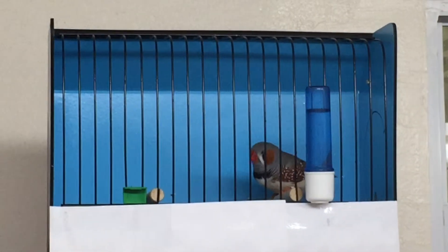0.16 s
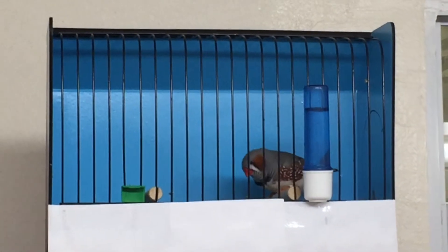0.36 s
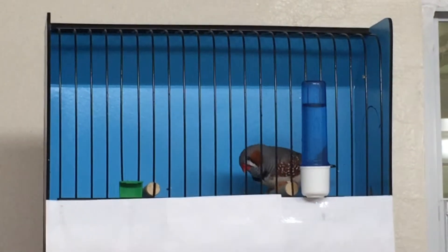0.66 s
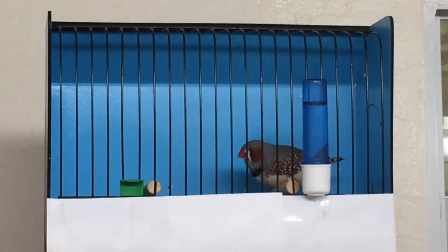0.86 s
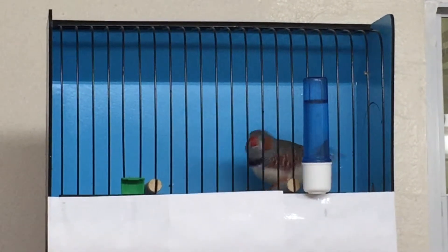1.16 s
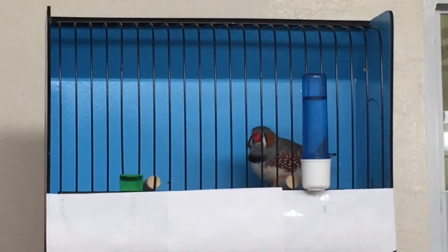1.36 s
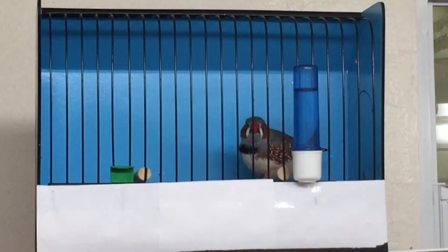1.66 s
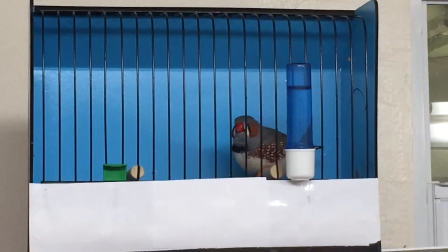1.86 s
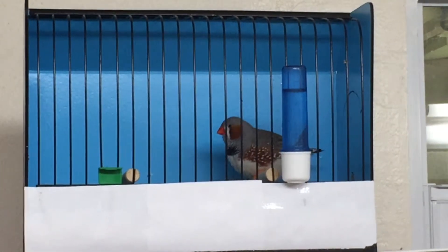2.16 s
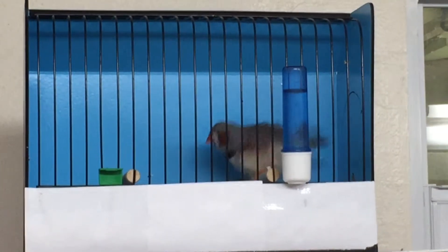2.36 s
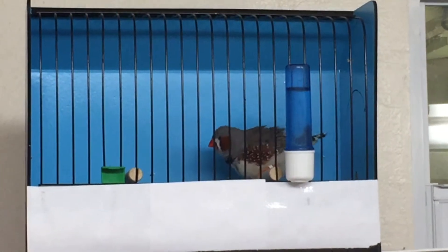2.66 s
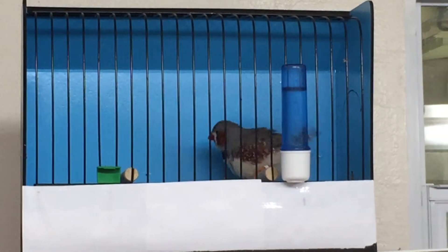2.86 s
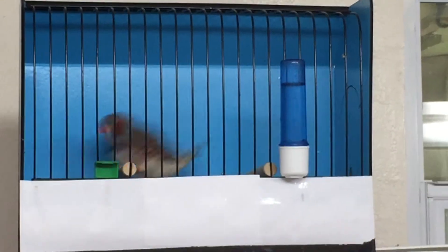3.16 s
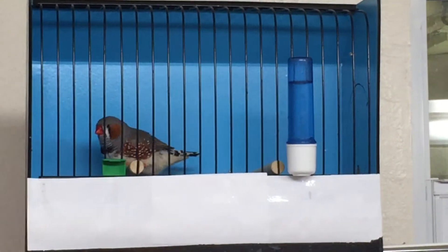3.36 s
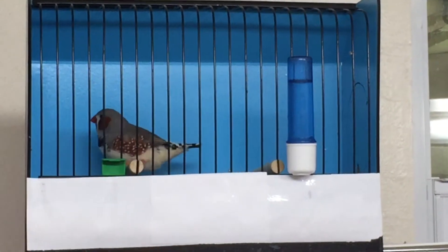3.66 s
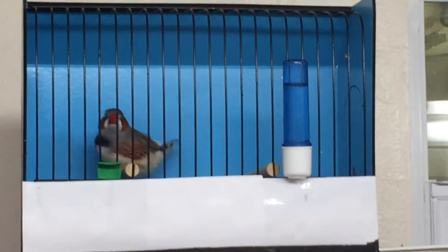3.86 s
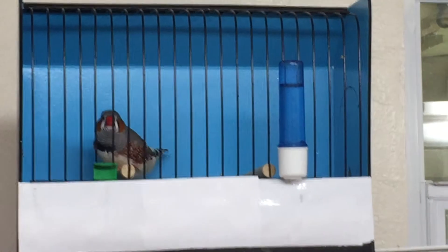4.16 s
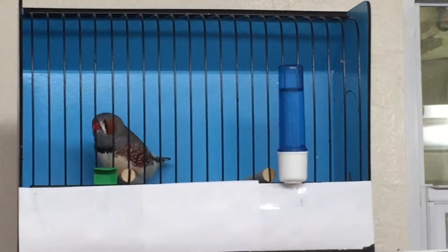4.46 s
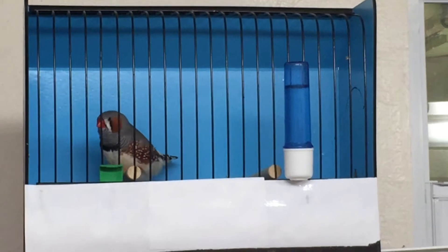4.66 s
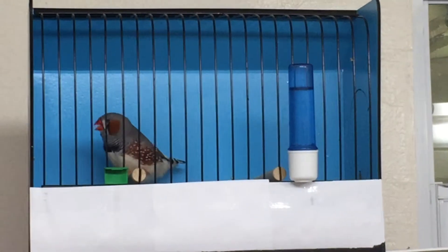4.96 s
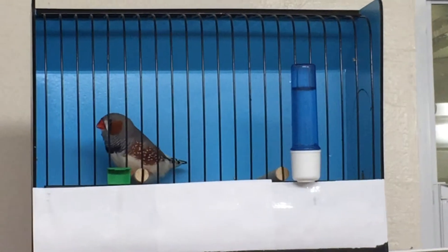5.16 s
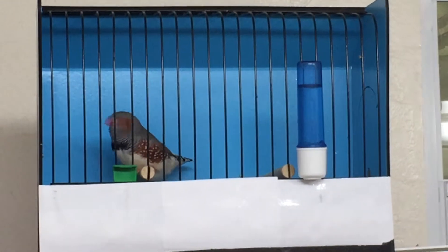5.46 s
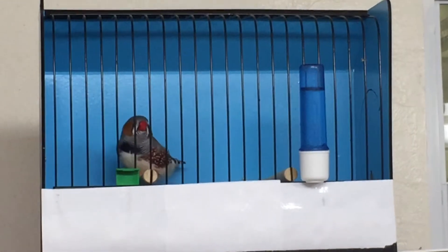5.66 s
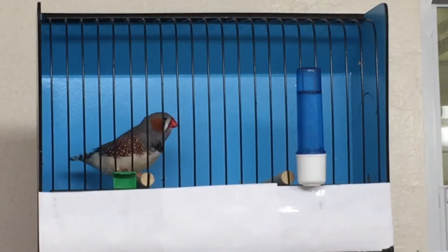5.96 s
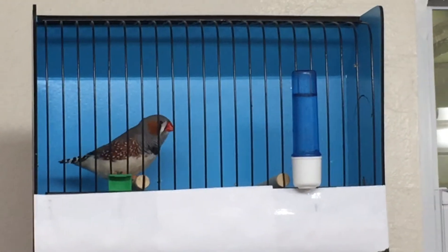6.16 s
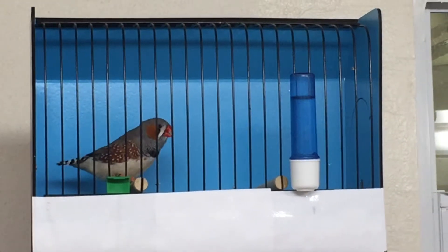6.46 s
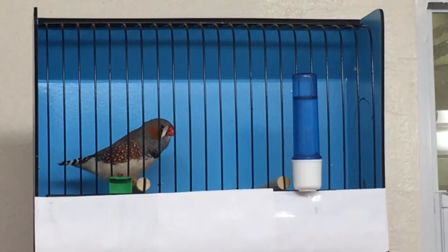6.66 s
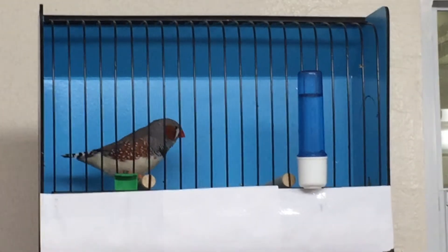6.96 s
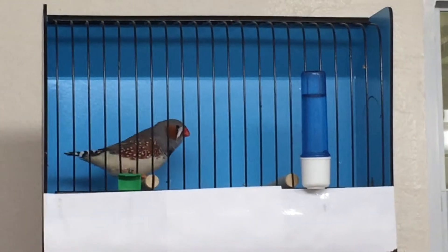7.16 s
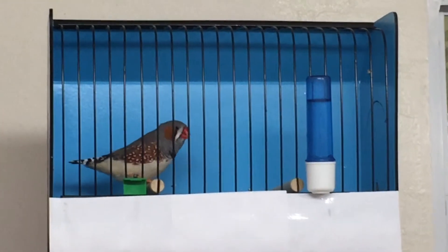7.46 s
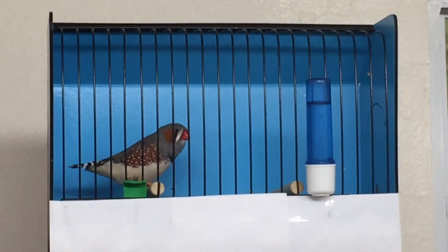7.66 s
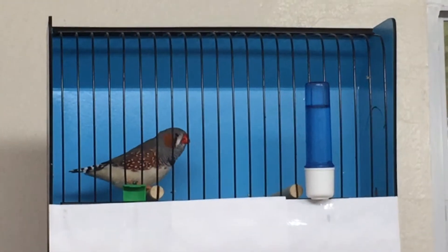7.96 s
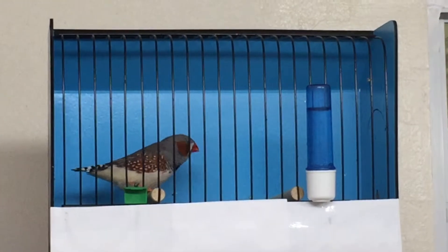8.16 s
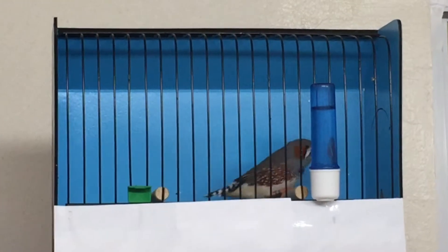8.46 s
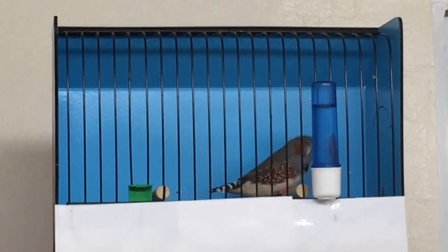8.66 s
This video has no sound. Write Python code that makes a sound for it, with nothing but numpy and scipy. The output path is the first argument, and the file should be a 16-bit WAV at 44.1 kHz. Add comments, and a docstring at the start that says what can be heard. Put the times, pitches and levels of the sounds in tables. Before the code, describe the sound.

Indoor finch cages heard from a handheld microphone a short distance away: rapid overlapping chatter of nasal beeps, scratchy song notes, tiny whistles and sharp high peeps. A quick cluster of chirps and rising breathy squeaks comes about halfway, then calls grow denser toward the end. Distant birds swell behind, small dry ticks come from perch and wire, and a quiet low motor hum continues throughout.

```python
"""Caged finches crowd a room: nasal calls made of steady syrinx pulses shaped by the beak resonance.
Gliding sines whistle, peep, chirp and squeak; jittery falling pulses with turbulence make harsh song syllables.
Claws and beaks tick on perch and wire as short noise cracks; far cages blur into a swelling chorus.
A motor hums in wavering lines, a far engine drones down in pitch, and decaying noise tails answer from the walls."""
import sys
import numpy as np
from scipy import signal
from scipy.fft import rfft, irfft, next_fast_len
from scipy.io import wavfile
from scipy.ndimage import uniform_filter1d, map_coordinates

SR = 44100
rng = np.random.default_rng(int(sys.argv[2]) if len(sys.argv) > 2 else 0)


def pcm_store(signal):
    """Save signal as 16-bit PCM."""
    levels = np.round(np.clip(np.atleast_2d(signal), -1, 1) * 32767)
    wavfile.write(sys.argv[1], SR, levels.astype(np.int16).T)


N = 388962  # samples

# nasal calls: start_s, length_s, middle_pitch_hz, beak_resonance_hz, level_db
NASAL_CALLS = [(.526, .066, 487, 2600, -46), (.95, .115, 489, 2650, -36), (1.075, .155, 665, 3400, -36.5),
               (1.29, .06, 675, 3800, -44), (1.68, .04, 566, 3500, -42), (1.745, .05, 512, 1900, -47),
               (1.81, .13, 659, 3100, -42), (2.318, .1, 485, 2700, -45), (2.44, .125, 553, 3400, -40),
               (2.61, .05, 628, 2400, -43), (2.69, .05, 452, 2000, -47), (3.03, .05, 557, 2100, -43),
               (3.14, .05, 452, 2000, -45), (3.266, .07, 450, 2400, -41), (3.449, .085, 487, 2300, -37.5),
               (3.642, .07, 490, 2500, -50), (3.939, .05, 553, 1900, -48), (4.04, .115, 631, 3100, -34),
               (4.485, .045, 454, 2200, -40), (4.724, .094, 578, 2300, -47), (5.595, .055, 651, 3200, -42),
               (5.716, .077, 685, 3600, -41), (6.065, .14, 510, 3300, -38), (6.272, .09, 600, 2600, -44),
               (6.372, .05, 539, 2900, -45), (6.723, .12, 665, 3200, -40), (6.98, .125, 588, 2600, -36),
               (7.175, .125, 666, 3700, -39), (7.295, .04, 814, 2000, -41), (7.89, .165, 668, 3800, -40),
               (8.076, .047, 625, 2100, -38), (8.124, .05, 562, 2800, -44), (8.23, .13, 590, 2700, -35),
               (8.735, .085, 642, 3000, -34.5)]
# first three partials of a call against the resonance's skirt; the nose weakens the third: gain_db
LOW_PARTIALS_DB = [-3, -2, -4]
# whistles: start_s, length_s, first_pitch_hz, last_pitch_hz, level_db
WHISTLES = [(0.0, 0.028, 2870, 2584, -36), (0.32, 0.077, 5830, 5640, -39.5),
            (0.494, 0.0096, 5200, 4940, -34.5), (0.752, 0.042, 1980, 2300, -39),
            (0.932, 0.031, 3170, 3270, -40), (1.369, 0.047, 5720, 5810, -37.5),
            (1.376, 0.018, 1910, 1580, -37), (1.468, 0.062, 6280, 6360, -48),
            (1.532, 0.044, 4020, 3960, -39.5), (1.957, 0.024, 4460, 4570, -41),
            (1.969, 0.042, 2440, 2780, -35.5), (2.145, 0.028, 2446, 2460, -37),
            (2.171, 0.15, 5470, 5500, -47.5), (3.328, 0.022, 2637, 2750, -35.5),
            (3.352, 0.026, 2260, 1814, -40.5), (3.49, 0.051, 3840, 4440, -33),
            (3.707, 0.041, 5660, 5520, -44), (3.759, 0.025, 2030, 2170, -40),
            (3.8, 0.026, 2385, 2390, -32.5), (3.959, 0.05, 6200, 5800, -45.5),
            (4.164, 0.047, 2530, 2670, -35.5), (4.808, 0.091, 5720, 5630, -41.5),
            (5.172, 0.094, 1895, 2540, -45), (5.21, 0.049, 4630, 4050, -28.5),
            (5.276, 0.012, 2200, 2050, -37), (5.811, 0.024, 4060, 4230, -34),
            (5.983, 0.048, 2320, 2530, -34), (6.255, 0.07, 5780, 5660, -44.5),
            (6.439, 0.038, 3024, 2107, -34), (6.776, 0.036, 4570, 4190, -28.5),
            (6.855, 0.099, 5840, 5450, -40.5), (7.381, 0.069, 2260, 2795, -41),
            (7.492, 0.021, 4470, 4390, -39.5), (7.738, 0.024, 2030, 1890, -34.5),
            (7.746, 0.041, 4230, 4000, -32), (7.95, 0.07, 6040, 6600, -49), (8.373, 0.052, 5520, 5620, -40),
            (8.394, 0.015, 1900, 1940, -33), (8.704, 0.037, 5250, 3400, -32)]
# thin high peeps that start sharp and sink: start_s, length_s, first_pitch_hz, level_db
PEEPS = [(0.012, 0.07, 6200, -42.5), (0.63, 0.069, 6300, -40.5), (1.046, 0.016, 5900, -35.5),
         (1.516, 0.029, 5920, -37), (1.776, 0.051, 6200, -40), (2.798, 0.065, 6300, -44),
         (3.4, 0.074, 6870, -47.5), (3.647, 0.085, 6300, -40), (4.177, 0.039, 7170, -50),
         (4.723, 0.13, 6250, -42), (5.313, 0.09, 7090, -51), (5.652, 0.088, 6200, -43),
         (6.172, 0.075, 6210, -43), (7.701, 0.041, 5900, -38.5), (8.001, 0.036, 6030, -37.5)]
# quick chirps rich in overtones: start_s, length_s, first_pitch_hz, last_pitch_hz, level_db
CHIRPS = [(2.19, 0.023, 1900, 1820, -36.5), (4.226, 0.038, 1150, 1062, -34), (4.272, 0.044, 1450, 826, -33),
          (8.715, 0.024, 1780, 1540, -31)]
# partials of a chirp, fundamental first: gain_db
CHIRP_PARTIALS_DB = [-1, 8.5, 6.5, -14, -8]
# breathy rising squeaks: start_s, length_s, first_pitch_hz, last_pitch_hz, level_db
SQUEAKS = [(4.259, 0.12, 4800, 7170, -44), (4.452, 0.11, 4570, 7200, -42)]
# harsh syllables, each starting 13 ms before its time: time_s, length_s, vowel_centre_hz, level_db
HARSH_SYLLABLES = [(0.021, 0.081, 4840, -46), (0.115, 0.056, 3000, -46.5), (0.245, 0.072, 3060, -41.5),
                   (0.375, 0.064, 3640, -35), (0.52, 0.043, 3630, -40.5), (0.695, 0.078, 2850, -37.5),
                   (0.775, 0.053, 2700, -41.5), (1.072, 0.095, 3400, -37), (1.191, 0.07, 3340, -41),
                   (1.3, 0.14, 2750, -44.5), (1.424, 0.051, 3230, -34.5), (1.549, 0.11, 3200, -35),
                   (1.808, 0.092, 3860, -40), (2.026, 0.089, 3230, -39), (2.14, 0.09, 2880, -37.5),
                   (2.248, 0.051, 4100, -39.5), (2.847, 0.045, 5150, -40), (3.018, 0.037, 2000, -44.5),
                   (3.274, 0.085, 2450, -46.5), (3.344, 0.087, 3030, -37), (3.409, 0.083, 2820, -38.5),
                   (3.506, 0.1, 3160, -38), (3.68, 0.053, 5000, -52), (3.76, 0.079, 2900, -44),
                   (4.272, 0.11, 3240, -32.5), (4.615, 0.069, 2220, -45), (5.039, 0.032, 3260, -32.5),
                   (5.106, 0.12, 2930, -40.5), (5.264, 0.1, 2880, -37), (5.494, 0.031, 2350, -40.5),
                   (5.682, 0.064, 3420, -38), (5.912, 0.12, 2500, -42), (6.059, 0.092, 3200, -42),
                   (6.452, 0.12, 2940, -34), (6.596, 0.05, 2880, -33.5), (6.668, 0.08, 3450, -38),
                   (6.78, 0.15, 3200, -37), (7.014, 0.13, 3660, -37), (7.163, 0.053, 2970, -36.5),
                   (7.37, 0.038, 2490, -33), (7.5, 0.045, 3100, -38.5), (7.552, 0.12, 3470, -34),
                   (7.745, 0.1, 3150, -35), (8.039, 0.054, 4570, -43), (8.218, 0.13, 3180, -36),
                   (8.405, 0.1, 3470, -35), (8.7, 0.06, 3430, -36)]
# colour of the throat: frequency_hz, gain_db
THROAT = [(500, -5), (900, -5.5), (1400, -4.5), (2200, -1), (3200, -3.5), (4400, 0.5), (5300, 1),
          (6800, -0.5), (8000, -127)]
# colour of breath turbulence: frequency_hz, gain_db
BREATH_HISS = [(5000, -6), (6500, -10.5), (9600, -11.5), (10500, -25), (12000, -20), (15000, -22)]
# ticks on perch and wire: start_s, level_db (before the tick's own colour)
TICKS = [(0.931, -41), (1.078, -33), (2.545, -31), (2.663, -43), (2.779, -37.5), (3.251, -43), (4.18, -32),
         (5.031, -37), (5.116, -39), (5.4106, -36), (7.504, -26)]
# swell of the birds in the far cages: time_s, level_db
CHORUS_SWELL = [(0.0, -38), (0.83, -43), (1.1, -38), (1.69, -48.5), (2.13, -36), (3.12, -51.5),
                (3.46, -40.5), (3.78, -50), (4.07, -40.5), (4.25, -42.5), (4.42, -39.5), (5.26, -40.5),
                (5.36, -77), (5.55, -48), (5.97, -35.5), (7.1, -40), (7.45, -41.5), (7.7, -39),
                (8.399, -38.5), (8.55, -43.5), (8.82, -33)]
# colour of distance, which takes treble from far sounds: frequency_hz, gain_db
DISTANCE = [(4200, 17), (5200, 1.5), (7000, 8)]
# motor lines: pitch_hz, wobble_rate_per_s (random knots), level_db
MOTOR_LINES = [(63.9, 1.52, -50), (125.9, 8.2, -57)]
# far engine: time_s, pitch_hz, level_db
ENGINE_DRONE = [(0, 88, -53), (1.4, 86, -47), (1.7, 86, -71), (2.3, 87, -48.5), (5.7, 79, -45.5),
                (6.2, 71, -52.5), (7.5, 70, -44), (8.82, 69, -41.5)]
# colour of the room tone: frequency_hz, gain_db
ROOM_TONE = [(20, -67), (45, -3.5), (97, -5.5), (208, -9.5), (350, -12), (530, -20.5), (670, -13.5),
             (860, -17), (1600, -17), (5740, -52), (7650, -52), (15500, -41)]
# decay of the wall echoes: frequency_hz, t60_s
WALL_DECAY = [(500, 0.09), (3000, 0.21), (10000, 0.23)]

RESONANCE_WIDTH_HZ, BUZZ_DB = 750, -32  # open beak's resonance; floor under its skirt
HOARSE_HZ = 14000  # an overtone this high would be all noise
SMALL_BODY_HZ = 650  # so small a bird radiates little below this
PEEP_REST_HZ, PEEP_SINK_HZ_PER_S = 4750, 20000  # where a peep levels out, and how fast it sinks there
HISS_AGAINST_VOICE_DB = -13  # treble hiss of a harsh syllable
MOTOR_STEADY = 3.5  # steady part of a motor line over its wavering part
TOP_HZ = 15400  # band limit


def amp(db):
    """Decibels to linear gain."""
    return 10 ** (np.asarray(db) / 20)


def unit(x):
    """Scale to rms 1."""
    return x / np.sqrt(np.mean(x ** 2) + 1e-20)


def along(points, hz):
    """Read a curve of (Hz, value) points on a log frequency axis."""
    f, v = np.transpose(points)
    return np.interp(np.log(hz + 1), np.log(f + 1), v, left=v[0], right=v[-1])


def wobble(n, rate):
    """A smooth random curve, rate knots a second."""
    knots = rng.standard_normal(int(n * rate / SR) + 4)
    return map_coordinates(knots, [np.arange(n) * rate / SR])


def coloured(x, points):
    """Filter x through a spectrum of (Hz, dB) points."""
    m = next_fast_len(len(x) + 4096)
    gain = amp(along(points, np.fft.rfftfreq(m, 1 / SR)))
    return irfft(rfft(x, m) * gain, m)[:len(x)]


def breath(length, attack, release):
    """Time axis and air pressure of one note: it rises, holds, then dies away."""
    t = np.arange(round((length + 5 * release) * SR)) / SR
    decay = np.exp(-np.clip(t - length, 0, None) / release)
    return t, np.clip(t / attack, 0, 1) * decay


def overtones(pitch, gains):
    """Sum sines at multiples of a moving pitch, scaled to rms 1."""
    k = np.arange(1, len(gains) + 1)[:, None]
    start = rng.uniform(0, 2 * np.pi, k.shape)
    phase = k * 2 * np.pi * np.cumsum(pitch) / SR + start
    return unit((gains * np.sin(phase)).sum(0))


def add(track, s, note):
    """Mix a note into the track at s seconds."""
    part = track[max(round(s * SR), 0):][:len(note)]
    part += note[:len(part)]


def nasal_calls(calls):
    """Steady syrinx pulses: overtones strongest near the beak resonance, hoarser the higher; the pitch arches."""
    out, k = np.zeros(N), np.arange(1, 25)[:, None]
    for s, length, middle, beak_hz, db in calls:
        t, push = breath(length - .01, attack=.02, release=.012)
        arch = 1 - 0.0344 * (2 * t / length - 1) ** 2
        pitch = middle * arch * (1 + 0.0042 * wobble(len(t), 60.5))
        partial_hz = k * middle
        peak_db = -6 * np.log1p(((partial_hz - beak_hz) / RESONANCE_WIDTH_HZ) ** 2)
        treble_loss_db = np.clip(partial_hz - 4800, 0, 1000) / 70
        peak_db = np.maximum(peak_db - treble_loss_db, BUZZ_DB)
        peak_db[:3, 0] += LOW_PARTIALS_DB
        peak_db -= np.clip(SMALL_BODY_HZ - partial_hz, 0, None) / 12
        start, sway = rng.uniform(0, 2 * np.pi, (2, *k.shape))
        uneven_db = rng.normal(0, 2.5, k.shape) + 2 * np.sin(70 * t + sway)
        hoarse = np.clip(partial_hz / HOARSE_HZ, 0, 1) ** 2
        tremble = unit(uniform_filter1d(rng.standard_normal(uneven_db.shape), size=140))
        strength = (1 - hoarse + hoarse * tremble) * amp(peak_db + uneven_db)
        tone = strength * np.sin(k * 2 * np.pi * np.cumsum(pitch) / SR + start)
        add(out, s, amp(db) * push * unit(tone.sum(0)))
    return out


def whistles():
    """Gliding tones that waver and flutter, with a weak octave; the higher, the rougher. Peeps join them."""
    out = np.zeros(N)
    plain = [(*row, row[1], .005) for row in WHISTLES]  # glide all along, start fast
    for s, length, first, last, db, glide, attack in plain + peeps():
        t, push = breath(length, attack, release=.008)
        pitch = np.interp(t, [0, glide], [first, last]) * (1 + 0.0224 * wobble(len(t), 131.2))
        pitch *= 1 + first / 330000 * wobble(len(t), 900)
        flutter = amp(3 * wobble(len(t), 140)) + first / 11000 * wobble(len(t), 700)
        add(out, s, amp(db) * push * unit(flutter) * overtones(pitch, amp([[0], [-34]])))
    return out


def peeps():
    """Whistle rows whose pitch sinks at a set rate to a resting pitch, or until the note's hold ends."""
    rows = []
    for s, length, first, db in PEEPS:
        glide = min(length, (first - PEEP_REST_HZ) / PEEP_SINK_HZ_PER_S)
        last = first - PEEP_SINK_HZ_PER_S * glide
        rows.append((s, length, first, last, db, glide, .022))  # soft attack, s
    return rows


def chirps():
    """Fast glides whose overtones pass through the throat's colour."""
    out = np.zeros(N)
    for s, length, first, last, db in CHIRPS:
        t, push = breath(length, attack=0.0011, release=0.0024)
        pitch = np.interp(t / length, [0, 1], [first, last])
        tone = overtones(pitch, amp(CHIRP_PARTIALS_DB)[:, None])
        add(out, s, amp(db) * push * unit(coloured(tone, THROAT)))
    return out


def squeaks():
    """Rising tones so unsteady that each overtone smears into a band."""
    out = np.zeros(N)
    for s, length, first, last, db in SQUEAKS:
        t, push = breath(length, attack=0.01, release=0.0042)
        rise = np.clip(1.8 * t / length - .5, 0, 1)
        smooth_rise = rise ** 2 * (3 - 2 * rise)
        pitch = (first + (last - first) * smooth_rise) * (1 + .035 * wobble(len(t), 1500))
        level = amp(db + 1.1 * wobble(len(t), 270))
        add(out, s, level * push * overtones(pitch, amp([[0], [-10], [-14]])))
    return out


def harsh_syllables():
    """Falling, jittery pulse trains with turbulence, under a scatter of broken tones; each has its own vowel."""
    out = np.zeros(N)
    for s, length, centre, db in HARSH_SYLLABLES:
        start, fall, slow = rng.uniform(size=3)
        t, push = breath(length, attack=.012 + .02 * slow, release=.014)
        pitch = (500 + 500 * start) * np.exp(-5 * fall ** 2 * t) * (1 + .01 * wobble(len(t), 200))
        pulses = np.diff(np.floor(np.cumsum(pitch) / SR), prepend=0)  # one click per cycle
        pulses = pulses * amp(rng.normal(0, 1.3, len(t)))
        noise = rng.standard_normal((2, len(t))) * amp(2.1 * wobble(len(t), 134.0))
        mix = unit(pulses) + .3 * noise[0] + .6 * unit(twitter(len(t), rate=700))
        vowel = [(700, -14), (centre / 1.8, 0), (centre, 7), (centre * 1.5, 0), (centre * 2.1, -8)]
        voice = coloured(coloured(mix, THROAT), vowel)
        ripple = np.transpose([np.geomspace(5000, 16000, 14), rng.normal(0, 3.5, 14)])
        turbulence = coloured(coloured(.5 * noise[1] + unit(pulses), BREATH_HISS), ripple)
        hiss = amp(2.3 * wobble(len(t), 61.0)) * turbulence
        # hiss follows the square of the air pressure
        syllable = push * amp(db) * unit(voice) + push ** 2 * amp(db + HISS_AGAINST_VOICE_DB) * unit(hiss)
        add(out, s - .013, syllable)
    return out


def twitter(n, rate):
    """Broken syllables: brief gliding tones of random pitch, length and strength, rate a second."""
    rows = rng.uniform(size=(int(n / SR * rate) + 1, 5))
    t = np.arange(SR // 40) / SR
    when, height, life, glide, size = rows.T[:, :, None]
    hz, life = 1200 * 5.2 ** height, .006 + .018 * life
    shape = np.sin(np.pi * np.clip(t / life, 0, 1))
    strength = amp(-2.5 * np.log(size + .08))
    tones = strength * shape * np.sin(2 * np.pi * hz * t * (1 + (5 * glide - 3.5) * t))
    where = (when * n).astype(int) + np.arange(len(t)) - len(t) // 4
    return np.bincount(np.clip(where, 0, n).ravel(), tones.ravel(), n + 1)[:n]


def ticks():
    """Claws and beaks on perch and wire: short bright noise cracks that die away exponentially."""
    out, t = np.zeros(N), np.arange(SR // 20) / SR
    for s, db in TICKS:
        crack = rng.standard_normal(len(t)) * amp(-60 * t / 0.079) * np.clip(t / 0.0043, 0, 1)
        add(out, s, amp(db) * coloured(crack, [(1000, -20), (3000, 1), (15000, -13.5)]))
    return out


def chorus():
    """Distant birds blur into calls, broken tones and breath noise that swell and thin out."""
    blur = unit(twitter(N, rate=660)) + 0.6 * rng.standard_normal(N)
    blur = unit(coloured(blur, THROAT))
    calls = .95 * unit(nasal_calls(far_calls(count=110)))
    hiss = amp(-25 + 5.9 * wobble(N, 12)) * unit(coloured(rng.standard_normal(N), BREATH_HISS))
    voices = unit(coloured(blur + calls, DISTANCE)) + hiss
    s, db = np.transpose(CHORUS_SWELL)
    swell_db = np.interp(np.arange(N) / SR, s, db)
    return amp(swell_db + 1.8 * wobble(N, 8.2)) * voices


def far_calls(count):
    """Nasal call rows for distant cages, one at a random moment in each equal slot of time."""
    when, length, pitch, size = rng.uniform(size=(count, 4)).T
    s = (np.arange(count) + when) / count * N / SR
    return np.transpose([s, 0.0336 + 0.056 * length, 450 + 230 * pitch, 1900 + 1500 * size, 6 * size])


def machines():
    """Motor lines unsteady in level and phase, an engine drone that sinks in pitch, and noise for room tone."""
    t = np.arange(N) / SR
    hum = np.zeros(N)
    for hz, rate, db in MOTOR_LINES:
        line = np.sin(2 * np.pi * hz * t + 2.84 * wobble(N, rate))
        hum += amp(db) * unit((MOTOR_STEADY + wobble(N, rate)) * line)
    s, hz, db = np.transpose(ENGINE_DRONE)
    drone_level = amp(np.interp(t, s, db) + 0.57 * wobble(N, 3.44))
    drone = drone_level * np.sin(2 * np.pi * np.cumsum(np.interp(t, s, hz)) / SR)
    air = amp(-50.0 + wobble(N, 6.7)) * unit(coloured(rng.standard_normal(N), ROOM_TONE))
    return hum + drone + air


def walls(x, parts):
    """Wall echoes: equal stretches of time each meet a freshly drawn decaying noise tail."""
    out, edges = np.zeros(N), np.linspace(0, N, parts + 1).astype(int)
    for a, b in zip(edges, edges[1:]):
        hz, t, z = signal.stft(rng.standard_normal(SR // 3), SR, nperseg=256)
        decay = amp(-60 * t / along(WALL_DECAY, hz)[:, None])
        tail = signal.istft(z * decay, SR, nperseg=256)[1]
        add(out, a / SR + .004, signal.fftconvolve(x[a:b], tail / np.linalg.norm(tail)))
    return out


def scene():
    """Mix near birds, far birds, wall echoes and machines."""
    calls = nasal_calls(NASAL_CALLS)
    notes = chirps() + whistles() + squeaks()
    harsh = harsh_syllables() + ticks()
    far = chorus()
    sends = amp(-4) * calls + amp(-8) * notes + amp(-5.0) * harsh + amp(-10.5) * far
    echoes = walls(sends, parts=30)
    return (calls + notes + harsh + amp(-2.5) * far + echoes + machines())[None]


def record(dry):
    """Nothing is kept above the band limit."""
    m = next_fast_len(N + 4096)
    kept = np.fft.rfftfreq(m, 1 / SR) < TOP_HZ
    return irfft(rfft(dry, m) * kept, m)[:, :N]


dry = scene()
out = record(dry)
pcm_store(out)
```